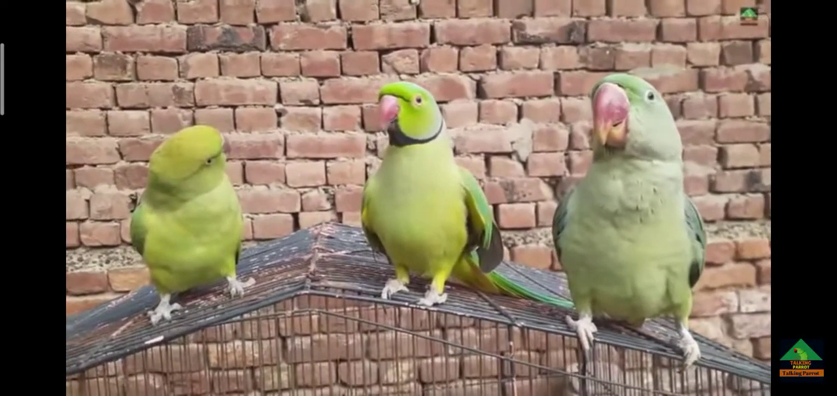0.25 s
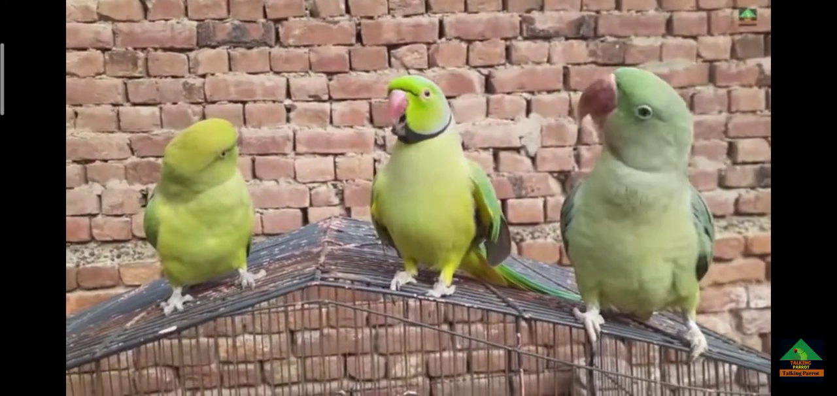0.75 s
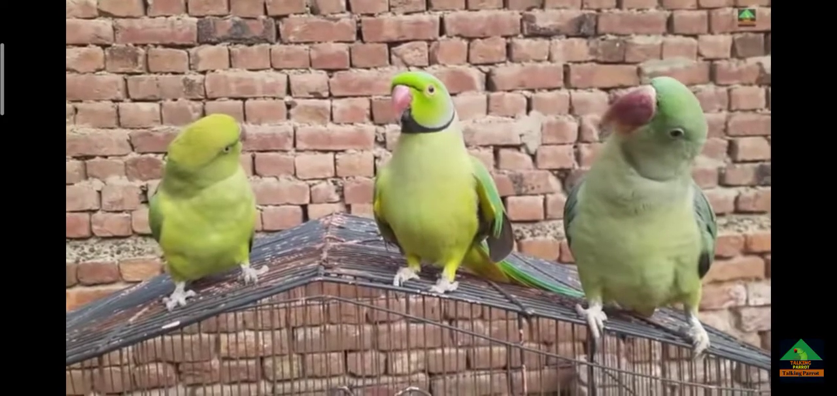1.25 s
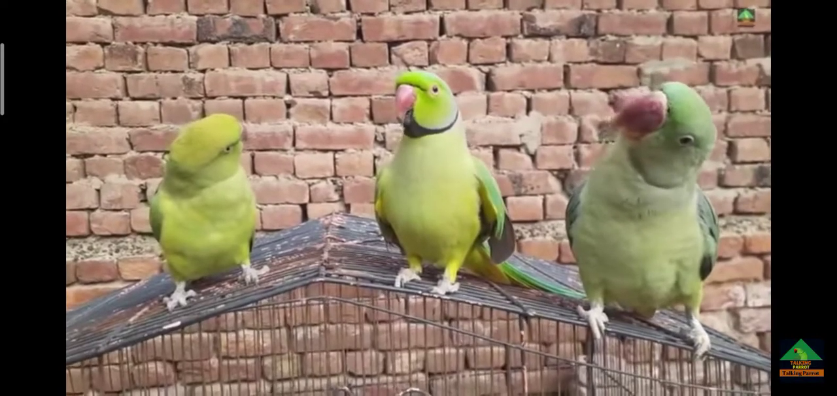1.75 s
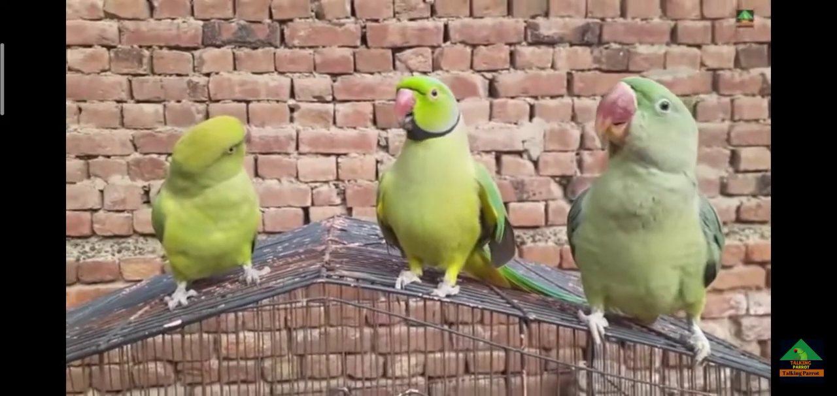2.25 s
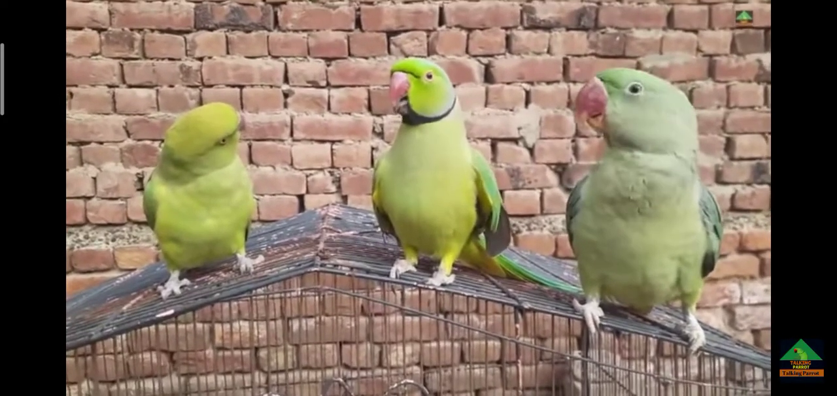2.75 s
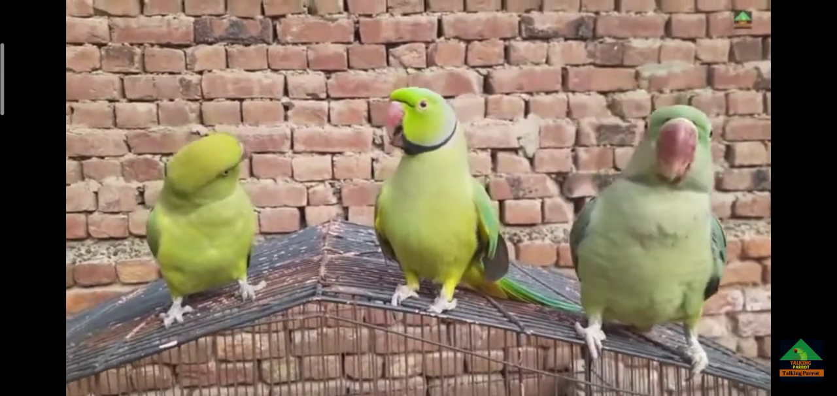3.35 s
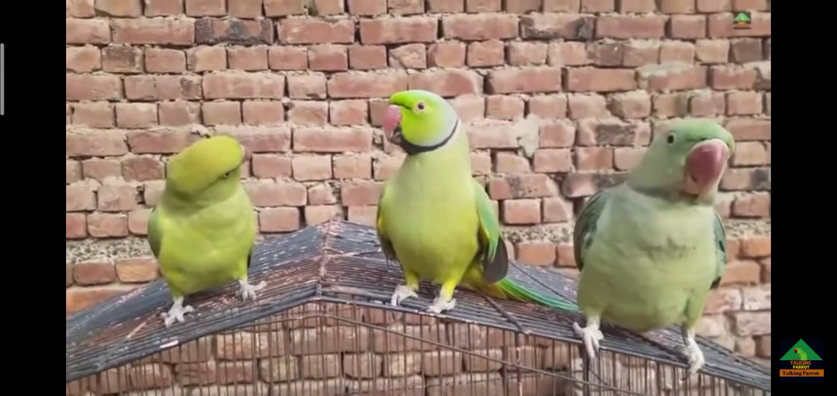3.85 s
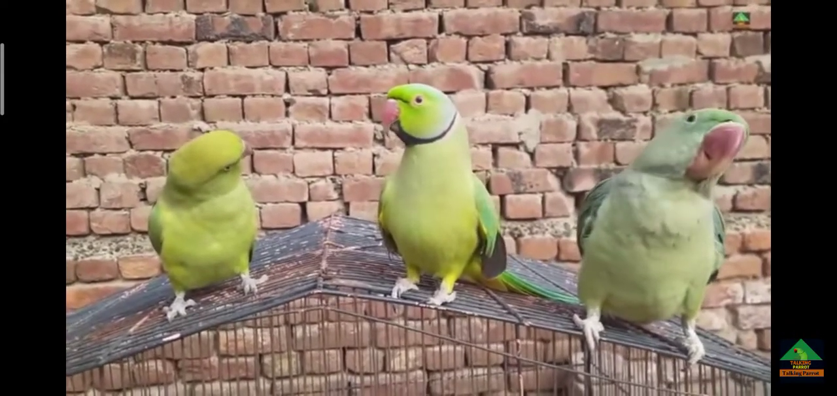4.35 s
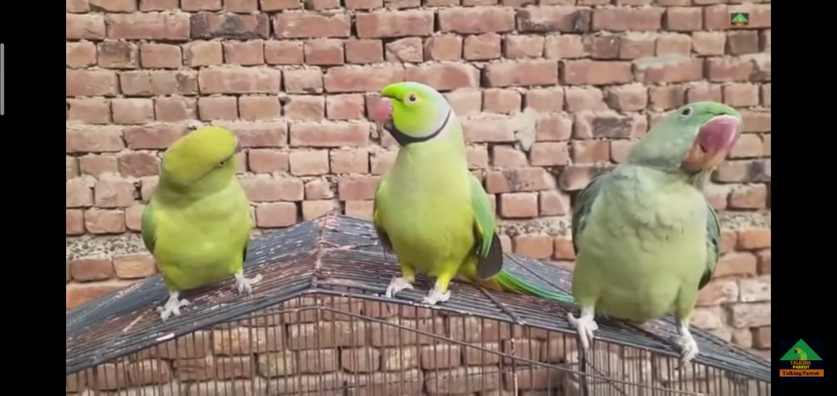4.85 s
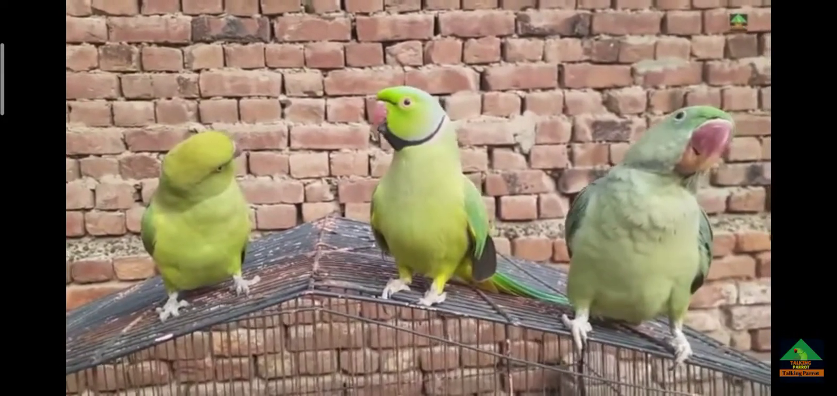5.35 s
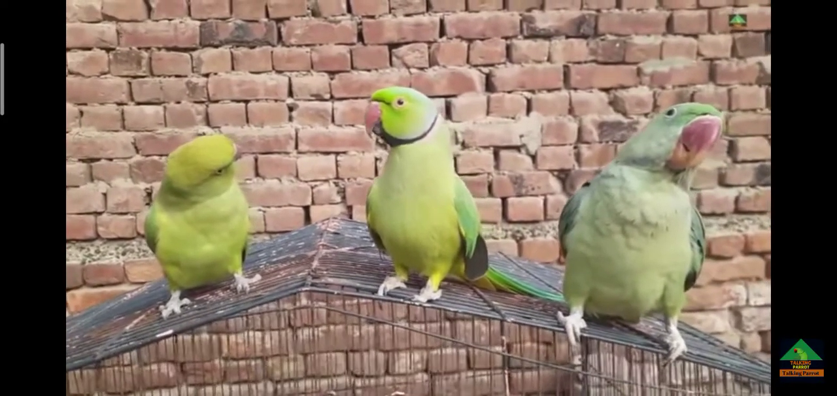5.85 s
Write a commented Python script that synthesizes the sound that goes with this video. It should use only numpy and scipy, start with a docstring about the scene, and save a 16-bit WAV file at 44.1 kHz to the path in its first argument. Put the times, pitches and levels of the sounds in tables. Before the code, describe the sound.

A brick-walled yard outdoors, with low distant engine drone and soft patchy street hiss throughout, swelling somewhat after 3 seconds. A quiet closed-beak parakeet call rises and dips until 0.25 s. From 0.5 to 0.95 s a long nasal call arches up and down, roughening as it fades. A whistle slides down, then sweeps sharply up between 1.3 and 1.85 s, amid brief high chirps at 1.3, 1.5, 1.75 and 2.0 s. Harsh rasping squawks come in pairs around 2.1, 2.6, 3.1 and 3.7 s, with a small soft call rising near 3.2 s. From 3.9 to 4.85 s five short calls hold, crack and sag, doubled by the wall. A wavering whistle swoops up by 4.85 s; another falls from 5.0 s, lifting slightly before 5.5 s. Claws tick occasionally on wire, clearest at 1.4, 2.3 and 3.9 s. Only drone and hiss remain at the end.

```python
"""Soft closed-beak parakeet calling over far engine drone and street hiss, then a long arched call,
sliding whistles, short chirps, rasping paired squawks and calls that break downward; claws tick on cage wire.
Rasps are rough pulse trains through throat resonances; whistles, chirps and soft calls are summed sine partials.
A brick wall doubles the bird beside it, the yard adds a thin tail, and a small microphone takes it all in."""
import sys
import numpy as np
from scipy import signal
from scipy.fft import rfft, irfft, next_fast_len
from scipy.io import wavfile
from scipy.ndimage import uniform_filter1d, map_coordinates

SR = 44100
rng = np.random.default_rng(int(sys.argv[2]) if len(sys.argv) > 2 else 0)


def file_out(sig):
    """Save sig as 16-bit WAV at sys.argv[1]."""
    # one column per channel
    cols = np.atleast_2d(sig).T
    # limit, then scale
    lim = np.clip(cols, -1, 1)
    pcm = np.round(lim * 32767).astype(np.int16)
    wavfile.write(sys.argv[1], SR, pcm)


def makeup_ratio(level_db):
    """Linear amplitude ratio for a level in decibels (20 dB per factor of ten)."""
    decades = np.asarray(level_db, float) / 20
    return 10 ** decades


N = 268877


def unit(x):
    """Scaled to rms 1."""
    return x / np.sqrt(np.mean(x ** 2) + 1e-20)


def along(points, hz):
    """Interpolates (frequency [Hz], value) points on a log frequency axis."""
    point_hz, value = np.transpose(points)
    return np.interp(np.log(hz + 1), np.log(point_hz + 1), value)


def wobble(n, rate_hz):
    """Smooth random curve with rate_hz knots a second."""
    knots = rng.standard_normal(int(n * rate_hz / SR) + 4)
    return map_coordinates(knots, [np.arange(n) * rate_hz / SR])


def filtered(x, response):
    """x through a complex response of frequency."""
    m = next_fast_len(len(x) + 8192)
    return irfft(rfft(x, m) * response(np.fft.rfftfreq(m, 1 / SR)), m)[:len(x)]


def note(rows):
    """First sample, soft-edged window and per-sample value of each column after time."""
    s, *columns = np.transpose(rows)
    t = np.arange(round(s[0] * SR), round(s[-1] * SR)) / SR
    edge = np.clip(np.minimum(t - t[0], t[-1] - t) / 0.003, 0, 1)
    return round(s[0] * SR), edge, [np.interp(t, s, c) for c in columns]


def add(out, at, x):
    """Mixes x into out from sample at."""
    out[at:at + len(x)] += x[:len(out) - at]


def tone(hz, partials_db, waver):
    """Clean syrinx tone with wavering pitch and partials; a partial near 0 dB has rms near 1."""
    phase = 2 * np.pi * np.cumsum(hz * (1 + waver * wobble(len(hz), 143.2))) / SR
    partials = (makeup_ratio(db + 1.5 * wobble(len(hz), 53.1)) * np.sin((k + 1) * phase)
                for k, db in enumerate(partials_db))
    return np.sqrt(2) * sum(partials)


# engines and street: (time [s], drone rms [dB], hiss rms [dB])
AIR_LEVELS = [(0.0, -44.5, -50), (0.9, -42.5, -48), (1.4, -44, -48), (1.9, -42, -46), (3.16, -40, -45.5),
              (4.24, -37, -44.5), (4.7, -39, -45), (5.3, -39, -46.5), (6.1, -37.5, -46.5)]
# relative drone spectrum: (frequency [Hz], density [dB per Hz])
DRONE_SPECTRUM = [(20, -27), (40, -10), (52, -19), (70, 3), (81, -3), (97, -2.5), (125, -4), (145, -9),
                  (209, -1.5), (224, -12), (243, -19.5), (330, -29.5), (430, -58), (730, -120)]
# relative hiss spectrum: (frequency [Hz], density [dB per Hz])
HISS_SPECTRUM = [(150, -34), (260, 0), (403, -2.5), (645, -11), (803, -8.5), (1170, -15), (1840, -13.5),
                 (2410, -18.5), (2640, -18), (3190, -23), (4430, -23.5), (6360, -27), (11000, -39),
                 (14300, -72), (22000, -120)]


def air():
    """Distant engines and street: low shaped noise plus hiss with random time-frequency patches."""
    s, drone_db, hiss_db = np.transpose(AIR_LEVELS)
    t = np.arange(N) / SR
    drone = unit(filtered(rng.standard_normal(N), lambda f: makeup_ratio(along(DRONE_SPECTRUM, f))))
    z = signal.stft(rng.standard_normal(N + 512), nperseg=512)[2]
    field = uniform_filter1d(uniform_filter1d(rng.standard_normal(z.shape), 6, 0), 10, 1)
    patchy = signal.istft(z * makeup_ratio(1.8 * unit(field)), nperseg=512)[1][:N]
    hiss = unit(filtered(patchy, lambda f: makeup_ratio(along(HISS_SPECTRUM, f))))
    return makeup_ratio(np.interp(t, s, drone_db)) * drone + makeup_ratio(np.interp(t, s, hiss_db)) * hiss


# yard decay: (frequency [Hz], t60 [s])
YARD_DECAY = [(500, 0.61), (3000, 0.23), (9000, 0.043)]


def yard(x):
    """Thin diffuse tail that dies faster in the treble."""
    hz, t, z = signal.stft(rng.standard_normal(SR // 3), SR, nperseg=256)
    decay = makeup_ratio(-60 * t / along(YARD_DECAY, hz)[:, None])
    tail = signal.istft(z * decay, SR, nperseg=256)[1]
    tail = makeup_ratio(-21) * tail / np.linalg.norm(tail)
    return signal.fftconvolve(x, np.pad(tail, (300, 0)))[:N]  # 300 samples of delay


# claws on wire: (time [s], level [dB], centre [Hz])
CLAW_TICKS = [(.1, -35, 6300), (.268, -32.5, 6160), (1.075, -38.5, 8000), (1.405, -25, 3260),
              (2.312, -25, 2860), (3.929, -18.5, 3100), (5.321, -29, 9900)]


def ticks():
    """Claw taps: a sine and noise burst that falls 60 dB in 4 ms."""
    out, t = np.zeros(N), np.arange(200) / SR
    for s, db, hz in CLAW_TICKS:
        tap = np.sin(2 * np.pi * hz * t) + 0.32 * rng.standard_normal(len(t))
        add(out, round(s * SR), makeup_ratio(db - 60 * t / 0.004) * (1 - np.exp(-t / 0.0002)) * tap)
    return out


# one list per stretch of closed-beak calling; the last two are one call's start and end:
# (time [s], pitch [Hz], reference level [dB])
SOFT_CALLS = [
    [(0.0, 605, -43.5), (0.1, 758, -41.5), (0.17, 817, -39.5), (0.204, 728, -43), (0.24, 592, -49),
     (0.255, 523, -83)],
    [(2.845, 739, -81), (2.863, 683, -49.5), (2.969, 662, -51), (3.029, 658, -49), (3.038, 675, -46)],
    [(3.14, 784, -44), (3.16, 891, -40.5), (3.186, 980, -34), (3.22, 1030, -36), (3.225, 1049, -38)],
]
# one list per stretch, from partial 1 up: (level re the reference [dB])
SOFT_CALL_PARTIALS_DB = [
    [-1.5, -2, -18, -22, -25, -24, -21.5],
    [-3.5, 7, -5.5, -14, -17],
    [-14, -3.5, -16, -9, -14],
]


def soft_calls():
    """Closed beak: mostly low partials over a little breath."""
    out = np.zeros(N)
    for rows, partials_db in zip(SOFT_CALLS, SOFT_CALL_PARTIALS_DB):
        at, edge, (hz, db) = note(rows)
        breath = filtered(rng.standard_normal(len(hz)),
                          lambda f: makeup_ratio(-12) * (f > 7500) + makeup_ratio(-10) * (f > 1200) * (f < 4500))
        voice = tone(uniform_filter1d(hz, 900), partials_db, waver=0.015)
        add(out, at, edge * makeup_ratio(db) * (voice + breath))
    return out


# one list per whistle: (time [s], pitch [Hz], level [dB])
WHISTLE_GLIDES = [
    [(1.335, 2380, -78), (1.349, 2247, -39), (1.397, 2120, -42), (1.54, 1820, -44.5), (1.593, 1743, -41.5),
     (1.703, 2051, -41.5), (1.715, 2110, -34.5), (1.801, 2590, -24), (1.827, 3256, -27.5),
     (1.84, 3100, -52)],
    [(1.085, 3700, -58), (1.1, 3670, -60), (1.15, 3600, -64), (1.16, 3600, -59)],
    [(2.37, 3400, -69), (2.39, 3360, -53.5), (2.448, 3426, -61), (2.46, 3440, -54)],
    [(4.38, 2042, -51), (4.404, 1913, -45), (4.48, 2134, -38), (4.57, 1870, -39), (4.63, 1576, -37.5),
     (4.68, 1790, -36.5), (4.76, 2218, -35), (4.822, 2577, -21.5), (4.86, 3140, -30), (4.875, 3127, -38)],
    [(5.022, 2906, -30.5), (5.03, 2844, -29.5), (5.054, 2640, -32), (5.102, 2110, -38.5),
     (5.132, 2040, -41), (5.198, 1917, -40), (5.358, 1768, -39), (5.44, 1850, -35), (5.48, 1970, -36),
     (5.495, 2060, -75)],
]
# from partial 1 up; the second at its strongest: (level [dB])
WHISTLE_PARTIAL_LEVELS_DB = [0, -22, -36]
BEAK_HZ = 3600  # second partial strongest here


def whistles():
    """Nearly pure glides; the beak lifts the second partial near its resonance."""
    out, (first_db, second_db, third_db) = np.zeros(N), WHISTLE_PARTIAL_LEVELS_DB
    for rows in WHISTLE_GLIDES:
        at, edge, (hz, db) = note(rows)
        partials_db = [first_db, second_db - np.abs(2 * hz - BEAK_HZ) / 35, third_db]
        add(out, at, edge * makeup_ratio(db) * tone(uniform_filter1d(hz, 1000), partials_db, waver=0.002))
    return out


# alias images, above and below each carrier by the whistle's pitch: (carrier [Hz], depth [dB])
ALIAS_CARRIERS = [(3930, -18.5), (7860, -20), (11790, -21)]


def alias_images(x):
    """Faint fuzzy alias images of x, no part of the bird's voice: x times randomly wavering carriers."""
    t = np.arange(N) / SR
    return x * sum(makeup_ratio(db) * wobble(N, 250) * np.cos(2 * np.pi * hz * t) for hz, db in ALIAS_CARRIERS)


TORN_DB = 3.5  # rms depth of random holes and lumps at roughness 1


def throat(f, modes):
    """Windpipe and beak resonances, alternating in sign."""
    return sum((-1) ** k * makeup_ratio(db) * 1j * f * width / (centre ** 2 - f * f + 1j * f * width)
               for k, (centre, width, db) in enumerate(modes))


def rasp(hz, rough, jitter, modes, scale, order=1):
    """Membrane slaps (partials from order up) and pulsed breath in moving resonances; 3.5-7.5 kHz rms near 1."""
    n, rough = len(hz), np.clip(rough, 0, 1)
    cycles = np.cumsum(hz * (1 + jitter * rough * wobble(n, 400))) / SR
    k = np.arange(order, 21)[:, None]
    uneven = makeup_ratio(3 * np.array([wobble(n, 30) for _ in k]))  # each partial swells on its own
    partials = (k * hz < 11000) * uneven * np.cos(2 * np.pi * k * cycles)
    slaps = np.sum(partials, axis=0) / np.sqrt(5500 / hz)
    slap_sizes = rng.standard_normal(int(cycles[-1]) + 2)[np.round(cycles).astype(int)]
    slaps *= makeup_ratio(2.5 * rough * slap_sizes)
    breath = (1 + 0.9 * np.cos(2 * np.pi * cycles)) * rng.standard_normal(n)
    source = np.sqrt(1 - 0.3 * rough) * slaps + np.sqrt(0.3 * rough) * breath
    source *= makeup_ratio(rough * wobble(n, 150))  # clumps
    f, t, z = signal.stft(source, SR, nperseg=512, noverlap=448)
    scale_at = np.interp(t * SR, np.arange(n), scale * np.ones(n))
    response = throat(f[:, None] / scale_at, modes)
    field = uniform_filter1d(rng.standard_normal(z.shape), size=4, axis=0)
    torn = unit(uniform_filter1d(field, size=14, axis=1))
    response = response * makeup_ratio(TORN_DB * np.interp(t * SR, np.arange(n), rough) * torn)
    sound = signal.istft(z * response, SR, nperseg=512, noverlap=448)[1][:n]
    upper = filtered(sound, lambda f: (f > 3500) & (f < 7500))
    return sound / np.sqrt(np.abs(uniform_filter1d(upper ** 2, 900)) + 1e-9)


# throat while calling, before scaling: (centre [Hz], width [Hz], level [dB])
CALL_RESONANCES = [(900, 480, -23), (1974, 820, 0), (2730, 940, 1), (4160, 1600, -1.5), (5750, 560, 2.5),
                   (6300, 590, -1.5), (10300, 2100, -13)]
CHEST_DB, CHEST_SHARE = -45.5, 0.51  # chest tone of a -32.5 dB call; its share of level changes


def voiced(rows):
    """Open-beak call from (time [s], pitch [Hz], level [dB], roughness) rows: rasp over a steadier chest tone."""
    at, edge, (hz, db, rough) = note(rows)
    hz = uniform_filter1d(hz, len(hz) // 12)
    chest_db = np.minimum(CHEST_DB + CHEST_SHARE * (db + 32.5), db + 18)
    chest = makeup_ratio(chest_db) * tone(hz, [0], waver=0.011)
    buzz = makeup_ratio(db) * rasp(hz, rough, jitter=0.102, modes=CALL_RESONANCES, scale=0.92, order=2)
    return at, edge * (buzz + chest)


# long arched call: (time [s], pitch [Hz], level [dB])
ARCH_CALL = [(0.508, 778, -66), (0.552, 990, -45.5), (0.602, 1208, -33.5), (0.641, 1278, -27),
             (0.7, 1334, -26), (0.766, 1269, -25.5), (0.854, 1032, -33), (0.91, 784, -40.5),
             (0.951, 679, -68)]
CLEAR_DB, ROUGH_PER_DB, LEAST_ROUGH = -28, 0.014, 0.04  # rougher as the level falls below CLEAR_DB


def arch():
    """Long open-beak call, pitch and level rising then falling, roughest where weakest."""
    out = np.zeros(N)
    rows = [(s, hz, db, LEAST_ROUGH + ROUGH_PER_DB * max(CLEAR_DB - db, 0)) for s, hz, db in ARCH_CALL]
    add(out, *voiced(rows))
    return out


# chirps: (time [s], level [dB], held pitch [Hz])
CHIRP_NOTES = [(1.297, -30, 3302), (1.525, -23, 3620), (1.762, -22.5, 3583), (2.024, -21, 3500)]
# partials of half the pitch, odd ones only once the note breaks: (level [dB])
HALF_PITCH_PARTIALS_DB = [-8.5, -2.5, -8.5, -9.5, -4.5, -20, -15]
CHIRP_HOLD_S, CHIRP_ATTACK_S = 0.017, 0.007


def chirps():
    """A held high note snaps on, bends down, then doubles its period and turns ragged."""
    out = np.zeros(N)
    for s, db, hz in CHIRP_NOTES:
        t = np.arange(round(0.06 * SR)) / SR
        late = np.maximum(t - CHIRP_HOLD_S, 0)
        broken = np.clip(late / 0.0087, 0, 1)
        bend = 0.68 + 0.32 * np.exp(-(late / 0.009) ** 1.5)
        half_hz = hz / 2 * bend * (1 + (0.012 + 0.07 * broken) * wobble(len(t), 600))
        phase = 2 * np.pi * np.cumsum(half_hz) / SR
        voice = sum(makeup_ratio(partial_db) * (1 if k % 2 else broken) * np.sin((k + 1) * phase)
                    for k, partial_db in enumerate(HALF_PITCH_PARTIALS_DB))
        level = makeup_ratio(db - late / 0.0015 + 1.7 * broken * wobble(len(t), 393))
        add(out, round(s * SR), level * np.clip(t / CHIRP_ATTACK_S, 0, 1) * voice)
    return out


# short open-beak calls: (time [s], hold [s], pitch [Hz], held level [dB], break level [dB])
BREAKING_CALLS = [(3.882, 0.023, 764, -54.5, -44), (4.09, 0.041, 818, -48, -41.5),
                  (4.309, 0.046, 1004, -36, -32.5), (4.542, .048, 1093, -35.5, -30),
                  (4.763, 0.063, 1099, -36, -38)]
# wall behind, one reflection: (delay [s], level [dB])
BRICK_ECHO = (.0096, -4)
LEVEL_PITCH_DB, SCOOP_PER_DB = -41, 0.006  # stronger holds climb to their pitch, weaker ones sag to it
ONSET_DB, ONSET_SHARE = -17, 0.65  # onset re held level; share of the hold until full
BREAK_S, FADE_S, FADE_DB = 0.02, 0.0409, -23  # hold end to break peak; fade after it
SAG = 0.68  # final pitch ratio
HELD_ROUGH, BREAK_ROUGH, END_ROUGH = 0.12, 0.25, 0.7


def chatter():
    """Bird by the wall: chirps and short calls that hold, break and sag, each doubled by the bricks."""
    out = chirps()
    for s, hold_s, hz, held_db, break_db in BREAKING_CALLS:
        turn = s + hold_s
        onset_hz = hz * (1 - SCOOP_PER_DB * (held_db - LEVEL_PITCH_DB))
        add(out, *voiced([
            (s, onset_hz, held_db + ONSET_DB, HELD_ROUGH),
            (s + ONSET_SHARE * hold_s, hz, held_db, HELD_ROUGH),
            (turn, hz, held_db, HELD_ROUGH),
            (turn + BREAK_S, hz * np.sqrt(SAG), break_db, BREAK_ROUGH),
            (turn + 2 * BREAK_S, hz * SAG, break_db + FADE_DB / 4, END_ROUGH),
            (turn + BREAK_S + FADE_S, hz * SAG, break_db + FADE_DB, END_ROUGH)]))
    delay_s, echo_db = BRICK_ECHO
    return out + makeup_ratio(echo_db) * np.pad(out, (round(delay_s * SR), 0))[:N]


# pairs by their peaks: (first time [s], first level [dB], second time [s], second level [dB], length scale)
SQUAWK_PAIRS = [(2.056, -30.5, 2.222, -29, 0.97), (2.542, -29, 2.724, -30, 0.92),
                (3.077, -30.5, 3.258, -27.5, 0.91), (3.657, -29, 3.836, -26.5, 0.81)]
# bend common to all: (time from peak [s], pitch [Hz], roughness [0-1], resonance scale)
SQUAWK_BEND = [(-.07, 600, .75, .97), (-.02, 1000, .95, 1.06), (.012, 1060, 1, 1.02), (.035, 800, .85, .95),
               (.06, 540, .7, .9), (.09, 420, .7, .88)]
# throat while squawking, before scaling: (centre [Hz], width [Hz], level [dB])
SQUAWK_RESONANCES = [(650, 600, -9), (1600, 320, -2), (2600, 520, 1), (4800, 750, 0), (6400, 800, -6),
                     (9300, 1400, -14)]
FIRST_S, SECOND_S = (0.065, 0.1), (0.071, 0.056)  # 20 dB swell and fade times at length scale 1
SWELL_POWER = 1.72  # 2 = bell-shaped, 1 = pointed
THROAT_SCATTER = 0.04  # resonance scale deviation, squawk to squawk


def squawks():
    """Harsh at full force; as the beak shuts, pitch and resonances slide down and the chest tone emerges."""
    out, (bend_s, *bend) = np.zeros(N), np.transpose(SQUAWK_BEND)
    since = np.arange(-SR // 8, SR // 6) / SR
    hz, rough, scale = (uniform_filter1d(np.interp(since, bend_s, c), size=400) for c in bend)
    for first_s, first_db, second_s, second_db, length in SQUAWK_PAIRS:
        pair = (first_s, first_db, FIRST_S), (second_s, second_db, SECOND_S)
        for s, peak_db, (swell_s, fade_s) in pair:
            span_s = np.where(since < 0, swell_s, fade_s) * length
            db = peak_db - 20 * (np.abs(since) / span_s) ** SWELL_POWER
            chest = makeup_ratio(-10.5) * np.clip(since / 0.04, 0.1, 1.6) * tone(hz, [0, -6], waver=0.06)
            opening = scale * rng.normal(1, THROAT_SCATTER)
            buzz = rasp(hz, rough, jitter=0.12, modes=SQUAWK_RESONANCES, scale=opening)
            add(out, round(s * SR) - SR // 8, makeup_ratio(db) * (buzz + chest))
    return out


def scene():
    """Birds with their yard tail, claws and the street; one channel."""
    glides = whistles()
    birds = soft_calls() + glides + alias_images(glides) + arch() + chatter() + squawks()
    return (air() + yard(birds) + ticks() + birds)[None]


SUPPRESS, LEAST_GAIN_DB = 0.37, -6.5  # share of steady noise power removed; deepest cut


def suppressor(x):
    """Subtracts part of the steady noise power from every bin, which leaves the background patchy."""
    z = signal.stft(x, nperseg=2048, noverlap=1536)[2]
    power = uniform_filter1d(np.abs(z) ** 2, size=3, axis=0) + 1e-18
    steady = uniform_filter1d(np.median(power, axis=1), size=15)[:, None]
    gain = np.sqrt(np.clip(1 - SUPPRESS * steady / power, makeup_ratio(2 * LEAST_GAIN_DB), 1))
    return signal.istft(z * gain, nperseg=2048, noverlap=1536)[1][:N]


# small microphone: (frequency [Hz], gain [dB])
MIC_RESPONSE = [(30, 1.5), (6800, 1.5), (7600, -11.5), (10800, -3.5), (11200, -24.5)]


def microphone(x):
    """Frequency response of a small microphone that loses the top."""
    return filtered(x, lambda f: makeup_ratio(along(MIC_RESPONSE, f)))


def top_cut(x):
    """Nothing passes above the cut-off."""
    return signal.sosfilt(signal.butter(12, 12020, fs=SR, output="sos"), x)


def record(dry):
    """Noise suppression, then the small microphone's response."""
    mix = microphone(suppressor(dry[0]))[None]
    return top_cut(mix)


dry = scene()
out = record(dry)
file_out(out)
```